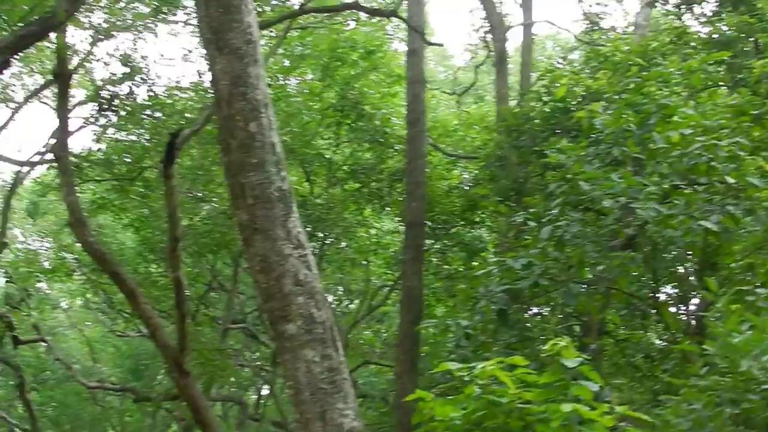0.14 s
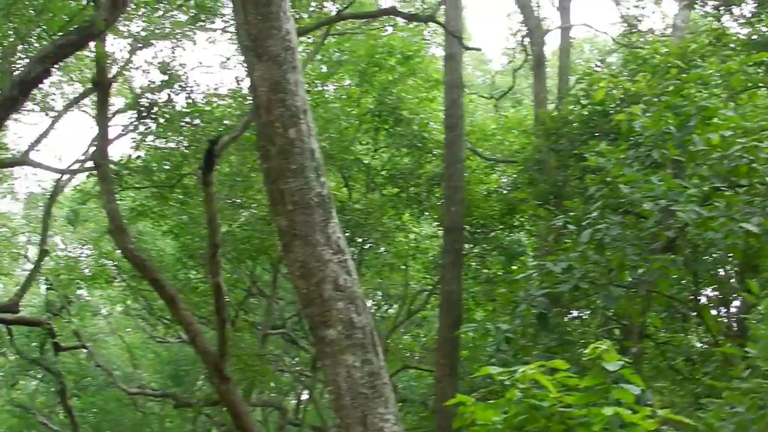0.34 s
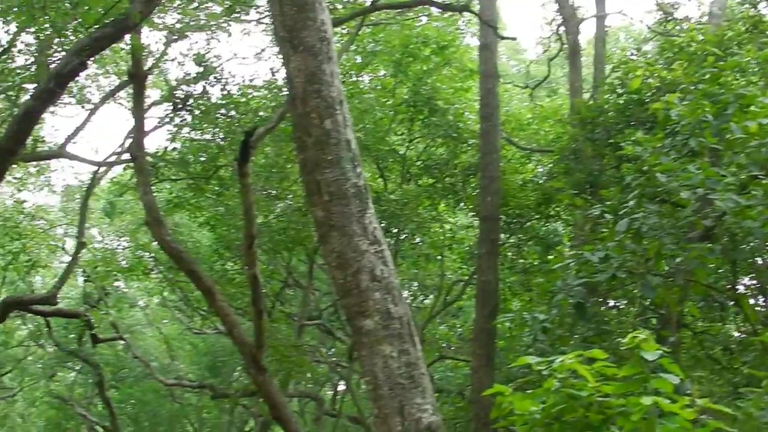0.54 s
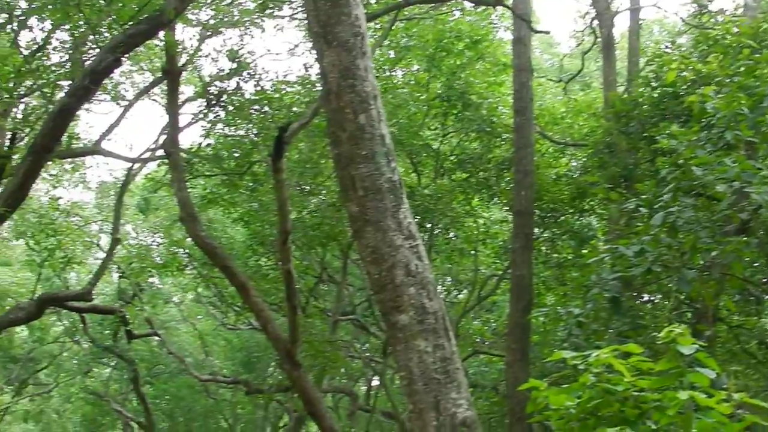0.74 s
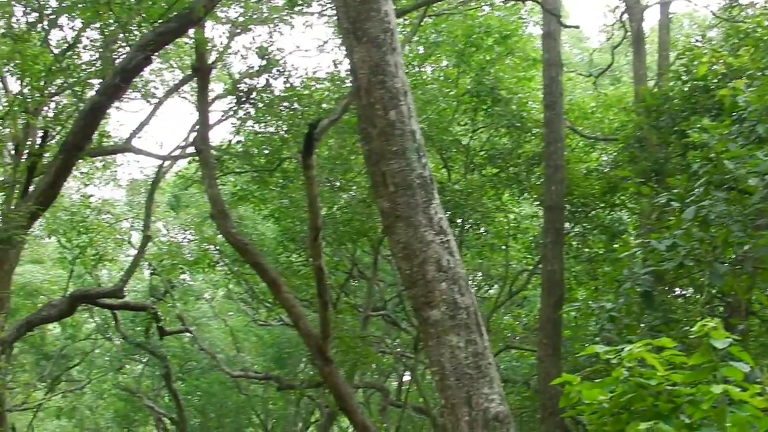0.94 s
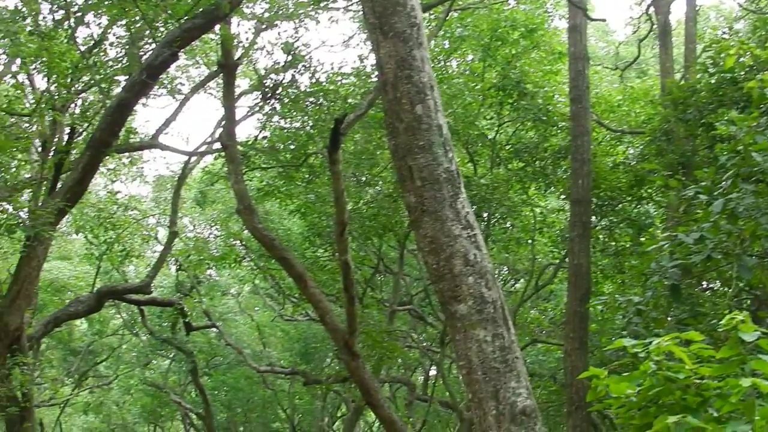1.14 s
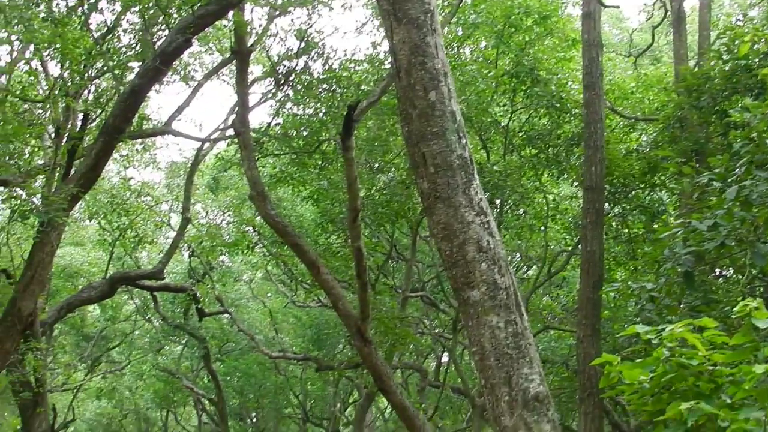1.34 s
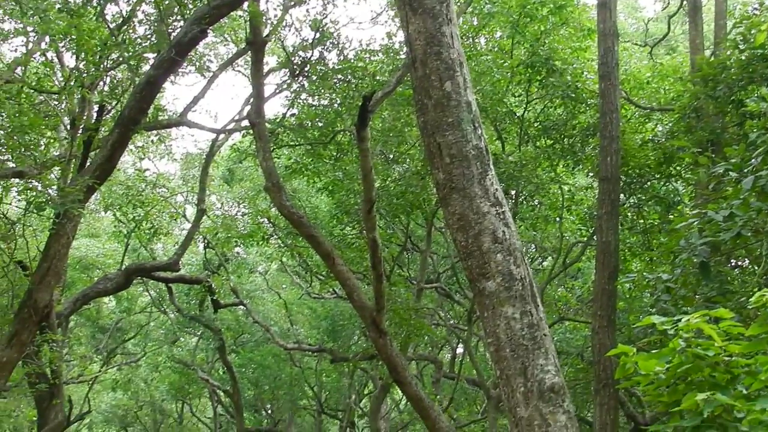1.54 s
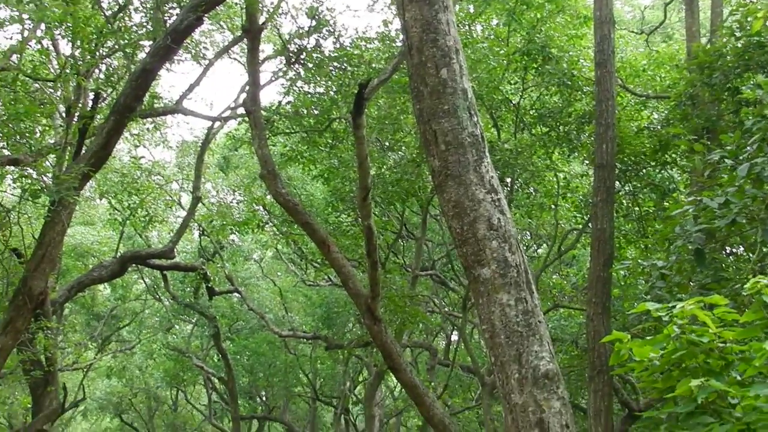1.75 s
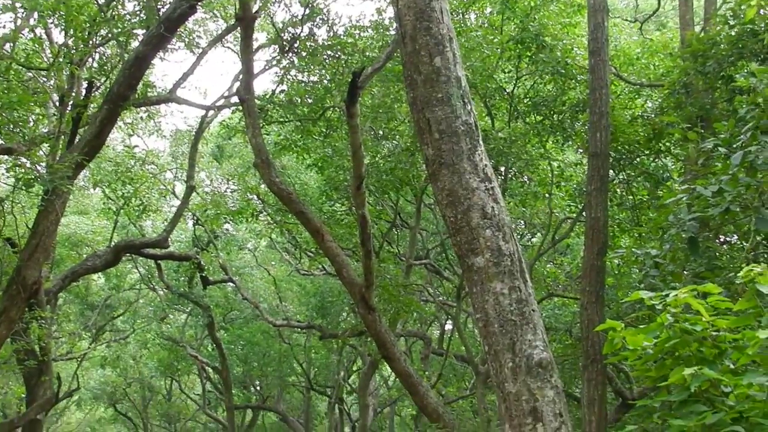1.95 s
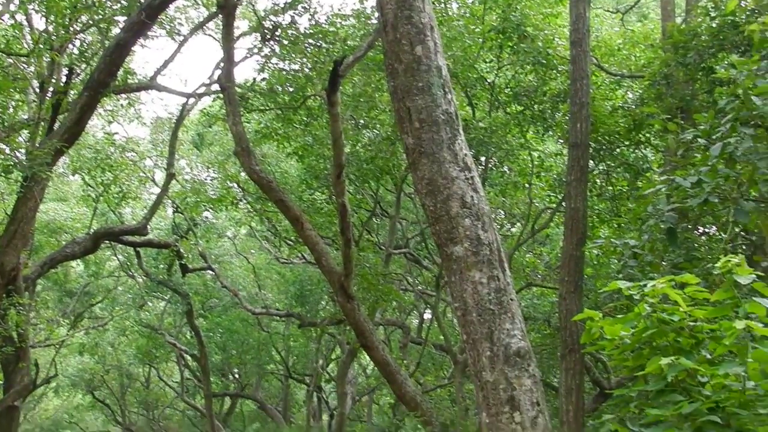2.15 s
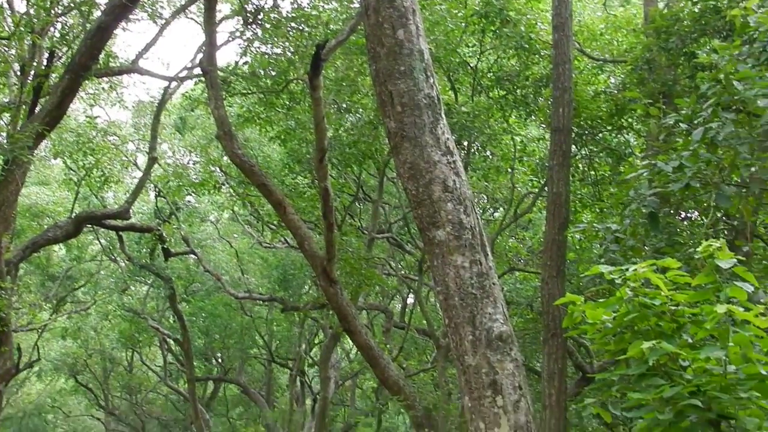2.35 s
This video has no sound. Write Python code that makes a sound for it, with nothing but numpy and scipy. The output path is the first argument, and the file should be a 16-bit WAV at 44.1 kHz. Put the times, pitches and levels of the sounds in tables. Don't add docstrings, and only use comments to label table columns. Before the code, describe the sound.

One rough, raspy bark from an unseen deer rings among trees over steady insect hiss

```python
import sys
import numpy as np
from scipy import signal
from scipy.fft import rfft, irfft, next_fast_len
from scipy.io import wavfile
from scipy.ndimage import uniform_filter1d

SR = 44100
rng = np.random.default_rng(int(sys.argv[2]) if len(sys.argv) > 2 else 0)


def bounce(signal):
    frames = np.transpose(np.atleast_2d(signal))
    limited = np.clip(frames, -1, 1)
    pcm = np.round(limited * 32767).astype(np.int16)
    wavfile.write(sys.argv[1], SR, pcm)


def gain_from_db(level_db):
    decades = np.asarray(level_db, float) / 20
    return 10 ** decades


N = 110691

# time in seconds, level in dB.
BARK_EFFORT = [
    (1.62, -61),
    (1.66, -44.5),
    (1.705, -40),
    (1.76, -39.5),
    (1.84, -38.5),
    (1.93, -37),
    (2.01, -44),
    (2.14, -45),
    (2.3, -56.5),
]
# centre in Hz, width in Hz, level in dB.
THROAT_RESONANCES = [(647, 56, 2.5), (756, 140, -2.5), (1015, 250, 0.5), (1214, 260, -2), (1557, 290, -1.5),
                     (1748, 220, -1), (2140, 290, -4.5), (2330, 130, -9.5), (2750, 1200, -5.5)]
# start in seconds, length in seconds, start pitch in Hz, end pitch in Hz, level in dB.
BIRD_NOTES = [
    (0.573, 0.11, 2958, 2830, -53.5),
    (0.692, .13, 4096, 4030, -51.5),
    (0.823, .15, 3430, 3247, -50.5),
    (0.968, 0.18, 3380, 3362, -52),
    (1.093, 0.079, 2640, 2373, -51),
    (1.205, .06, 2400, 2374, -68),
    (1.258, 0.032, 2760, 2460, -58),
    (1.34, 0.0924, 3117, 2881, -47),
]
# centre in Hz, width in Hz, level in dB, flicker in dB,
# left-right likeness from 0 to 1, lean to the left in dB.
INSECT_CHORUSES = [(2975, 174, -55, -2.5, 0.76, -3.5), (4674, 223, -58, 1.5, 0.63, -4),
                   (5605, 1180, -49.5, -0.4, 0.58, 0.1), (6250, 1230, -64.5, 4, 0.25, 3)]
# time in seconds, level in dB.
CICADA_SWELL = [
    (0.0, -48.5),
    (0.71, -50),
    (1.46, -50),
    (1.5, -46.5),
    (2.03, -49),
    (2.27, -47),
    (2.5, -51),
    (2.51, -46),
]
# time in seconds, level in dB, pitch in Hz, decay in seconds.
FINGER_KNOCKS = [
    (0.339, -37.5, 130, 0.0011),
    (1.713, -48.5, 91.5, .009),
    (1.818, -45, 85.3, 0.0049),
    (1.915, -46, 100, 0.0078),
    (2.128, -49, 90, 0.0073),
    (2.167, -47, 111, .007),
    (2.402, -54, 71, 0.0077),
]
# frequency in Hz, density in dB per Hz.
AIR_COLOUR = [(15, -59), (25, -46.5), (85, -1), (200, -7.5), (225, -29.5), (338, 3.5), (642, -7.5),
              (1290, -11), (2600, -17), (3380, -49), (5720, -120)]
# frequency in Hz, density in dB per Hz.
HISS_COLOUR = [(2000, -55), (3600, 6), (5000, -4.5), (7500, -9), (9000, -1.5), (12000, -9), (15000, -8)]
# frequency in Hz, left-right likeness from -1 to 1.
NOISE_LIKENESS = [(60, 0.41), (300, 0.14), (700, 0.24), (1400, -0.28), (3000, 0.39), (8000, -0.27),
                  (13000, -0.21)]

AIR_PAN_DB = -1.3


def level(x, db):
    return x * gain_from_db(db) / np.sqrt(np.mean(x ** 2))


def ring(x, hz, width_hz, order=2):
    size = next_fast_len(N)
    f = np.arange(size // 2 + 1) * SR / size + 1e-3
    detune = (f / hz - hz / f) * hz / width_hz
    return irfft(rfft(x, size) / (1 + 1j * detune) ** order, size)[..., :N]


def curve(table, hz):
    table_hz, value = np.array(table).T
    return np.interp(np.log(hz), np.log(table_hz), value)


def walk(rate):
    hold = int(SR / rate)
    steps = rng.standard_normal(N // 256)[:N // hold + 1]
    drift = np.repeat(steps, hold)[:N]
    drift = uniform_filter1d(uniform_filter1d(drift, hold), hold)
    return (drift - drift.mean()) / drift.std()


def pair(alike):
    mid, side = rng.standard_normal((2, N))
    c = np.clip(alike, -1, 1)
    return np.sqrt((1 + c) / 2) * mid + np.sqrt((1 - c) / 2) * side * np.array([[1], [-1]])


def pan(x, db):
    return x * gain_from_db(np.array([[db / 2], [-db / 2]]))


def fold_slaps(t):
    pitch_hz, sag_hz_per_s, jitter, scatter_db = 91, 4, 0.06, 1.5
    chance = rng.standard_normal((100, 2))
    start = BARK_EFFORT[0][0]
    at, times = start, []
    for c in chance[:, 0]:
        times.append(at)
        hz = max(pitch_hz - sag_hz_per_s * (at - start), 30)
        at += np.clip(1 + jitter * c, 0.4, 2) / hz
    times = np.array(times)
    keep = times < t[-1]
    slaps = np.zeros(N)
    slaps[(times[keep] * SR).astype(int)] = gain_from_db(scatter_db * chance[keep, 1])
    return slaps


def throat(source, slack_db):
    opening = 0.2
    out = 0
    for k, (hz, width_hz, db) in enumerate(THROAT_RESONANCES):
        gain = gain_from_db(db + opening * slack_db * np.log2(hz / 632)) * np.sqrt(100 / width_hz)
        out = out + (-1) ** k * gain * ring(source, hz, width_hz)
    return out / np.std(out[slack_db > -6])


def howl(t):
    pitch_hz, wobble_hz, flicker_db = 632, 8, 4
    breaks_s, fade_db_per_s = 2.0, 60
    flicker = gain_from_db(flicker_db * walk(30.54))
    tone = flicker * np.sin(2 * np.pi * np.cumsum(pitch_hz + wobble_hz * walk(35)) / SR)
    return level(tone, -7 - fade_db_per_s * np.maximum(t - breaks_s, 0))


def deer():
    rasp, puff_s = 0.7, 0.009
    t = np.arange(N) / SR
    slaps = fold_slaps(t)
    puff = signal.lfilter([1], [1, -np.exp(-1 / (puff_s * SR))], slaps)
    breath = puff * rng.standard_normal(N)
    source = (1 - rasp) * level(slaps, 0) + rasp * level(breath, 0)
    times, effort_db = np.array(BARK_EFFORT).T
    slack_db = np.interp(t, times, effort_db) - effort_db.max()
    chest = level(ring(source, 114, 187), -22.5)
    effort = gain_from_db(np.interp(t, times, effort_db, left=-150, right=-150))
    effort = uniform_filter1d(effort, size=400)
    return effort * (throat(source, slack_db) + howl(t) + chest)


def forest(x, wet_db, alike, share=1):
    t60_s, treble_t60_s, rise_s = 1.7, 1.26, 0.01
    t = np.arange(N) / SR / share
    noise = pair(alike)
    low = ring(noise, 470, 1200, order=1)
    tail = low * gain_from_db(-60 * t / t60_s) + (noise - low) * gain_from_db(-60 * t / treble_t60_s)
    tail = tail * (1 - np.exp(-t / rise_s))
    tail = tail / np.sqrt(np.sum(tail ** 2) / 2)
    return x + gain_from_db(wet_db) * signal.fftconvolve(x[None], tail, axes=1)[:, :N]


def bird():
    warble_hz, flutter_db = 70, 3
    t, out, warble = np.arange(N) / SR, 0, walk(85)
    for start, length, start_hz, end_hz, db in BIRD_NOTES:
        u = np.clip((t - start) / length, 0, 1)
        hz = end_hz + (start_hz - end_hz) * (1 - u) ** 1.927
        hz = hz + warble_hz * warble * (end_hz / 4000) ** 2
        breath = np.sin(np.pi * u ** 1.5) ** 0.7
        out = out + gain_from_db(db) * breath * np.sin(2 * np.pi * np.cumsum(hz) / SR)
    return out * gain_from_db(flutter_db * walk(60.25))


def insects():
    swell_db = np.interp(np.arange(N) / SR, *np.array(CICADA_SWELL).T)
    swell_db = swell_db - swell_db.mean()
    out = 0
    for k, (hz, width_hz, db, flicker_db, alike, pan_db) in enumerate(INSECT_CHORUSES):
        crowd = level(ring(pair(alike), hz, 1.86 * width_hz, order=4), db)
        motion_db = flicker_db * walk(14.35)
        if k > 0:
            motion_db = motion_db + swell_db
        out = out + pan(crowd * gain_from_db(motion_db), pan_db)
    return out


def knocks():
    out = 0
    for start, db, hz, decay in FINGER_KNOCKS:
        t = np.maximum(np.arange(N) / SR - start, 0)
        thump = t / decay * np.exp(1 - t / decay)
        out = out - gain_from_db(db) * thump * np.sin(2 * np.pi * hz * t)
    return out


def noise_bed(colour, db, low_hz, count, flicker_db):
    out = 0
    for hz in low_hz * 2 ** (np.arange(count) / 2):
        gain_db = curve(colour, hz) + 10 * np.log10(hz) + flicker_db * walk(16)
        band = ring(pair(curve(NOISE_LIKENESS, hz)), hz, hz / 2)
        out = out + level(band, 0) * gain_from_db(gain_db)
    return level(out, db)


def air():
    return pan(noise_bed(AIR_COLOUR, -52.5, 51.1, count=12, flicker_db=2.0), AIR_PAN_DB)


def camera_hiss():
    return pan(noise_bed(HISS_COLOUR, -55, 2820, count=6, flicker_db=1.4), 2)


def scene():
    bark = pan(forest(deer(), wet_db=1.5, alike=0.82), -3.5)
    song = pan(forest(bird(), wet_db=0.5, alike=0.5, share=0.84), -5.5)
    return bark + song + insects() + pan(knocks(), AIR_PAN_DB) + air()


def roll_off(x):
    return signal.sosfilt(signal.butter(12, 15680, fs=SR, output="sos"), x)


def record(dry):
    late = np.array([dry[0], np.roll(dry[1], shift=1)])
    late = late + camera_hiss()
    cut = signal.sosfilt(signal.butter(3, 56, "high", fs=SR, output="sos"), late)
    cut = signal.sosfilt(signal.butter(4, 15300, fs=SR, output="sos"), cut)
    return roll_off(cut)


dry = scene()
out = record(dry)
bounce(out)
```